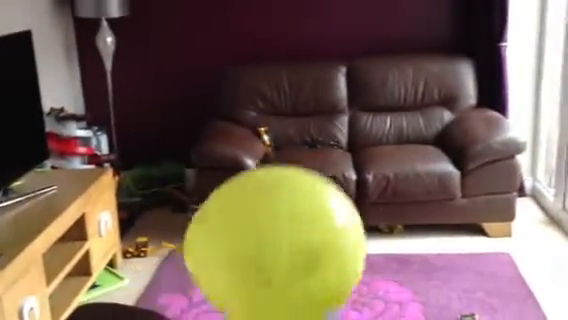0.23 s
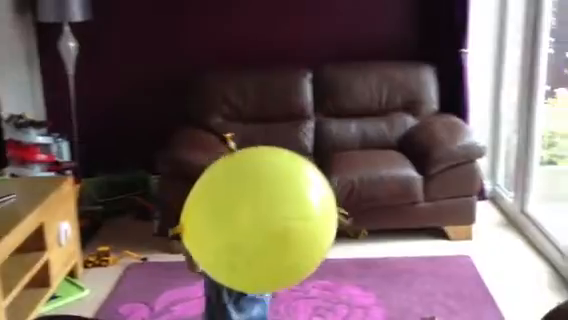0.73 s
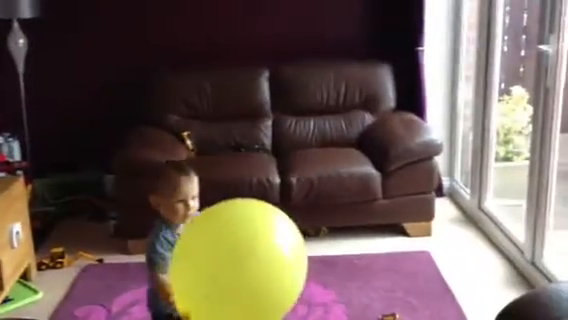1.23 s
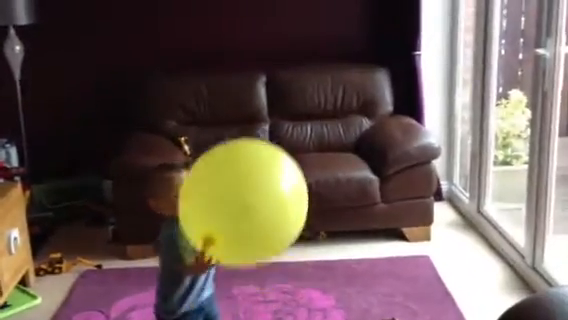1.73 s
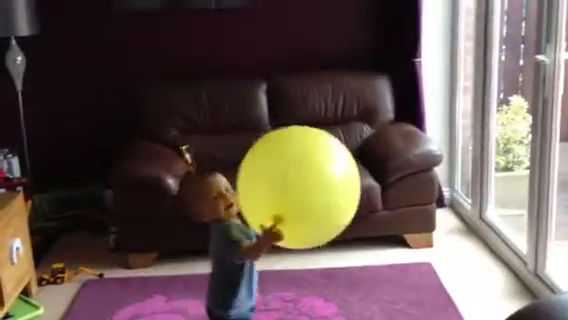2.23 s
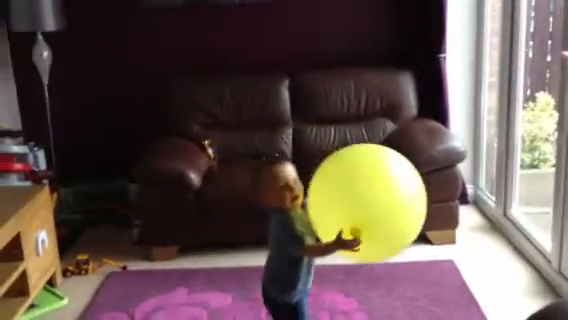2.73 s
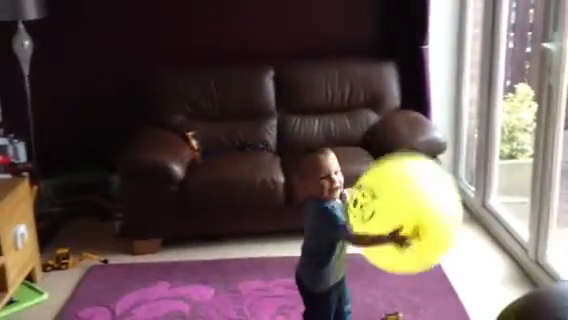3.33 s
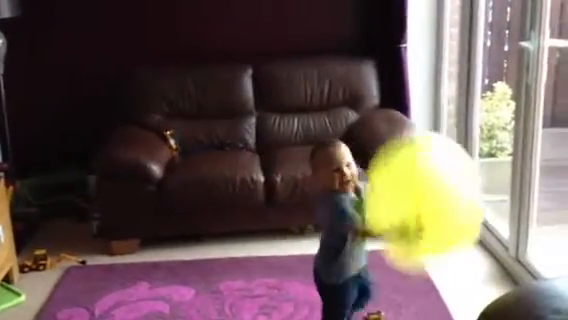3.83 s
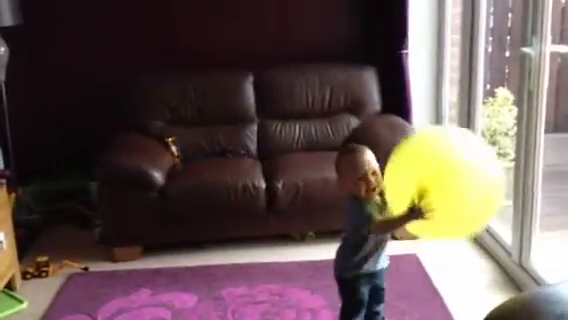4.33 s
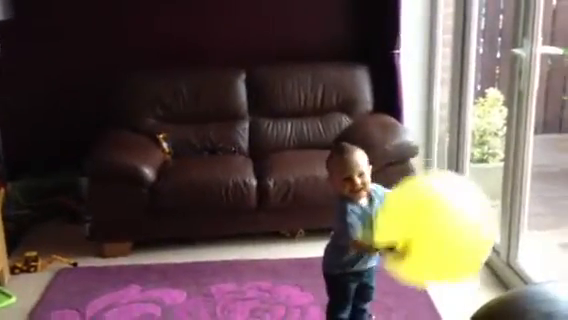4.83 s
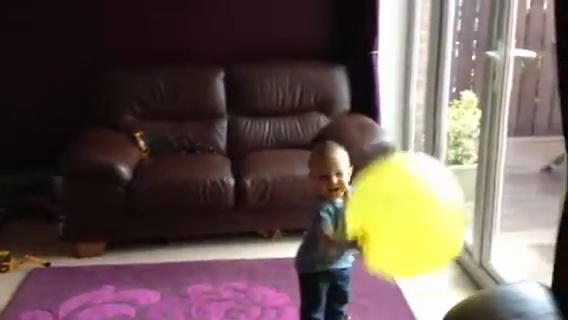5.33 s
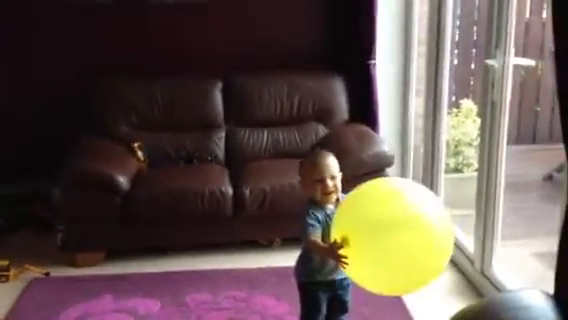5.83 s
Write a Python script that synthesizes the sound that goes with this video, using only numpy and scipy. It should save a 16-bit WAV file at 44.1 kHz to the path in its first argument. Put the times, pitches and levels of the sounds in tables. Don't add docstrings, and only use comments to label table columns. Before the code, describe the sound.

A large rubber balloon with grains inside is carried, patted and tipped over soft footsteps, then shaken into a dense, scratchy, drumming rattle.

```python
import sys
import numpy as np
from scipy import signal
from scipy.fft import rfft, irfft
from scipy.io import wavfile
from scipy.ndimage import uniform_filter1d

SR = 44100
rng = np.random.default_rng(int(sys.argv[2]) if len(sys.argv) > 2 else 0)


def ratio_of_db(decibels):
    return 10 ** (np.asarray(decibels, float) / 20)


def file_out(sig):
    cols = np.atleast_2d(sig).T
    lim = np.clip(cols, -1, 1)
    pcm = np.round(lim * 32767).astype(np.int16)
    wavfile.write(sys.argv[1], SR, pcm)


N = 267731


def evened(x):
    return x / np.sqrt(np.mean(x ** 2) + 1e-20)


def read(points, hz):
    f, value = np.transpose(points)
    return np.interp(np.log(hz + 1), np.log(f + 1), value)


def add(mix, s, sound):
    part = mix[round(s * SR):][:len(sound)]
    part += sound[:len(part)]


def coloured(x, spectrum):
    hz = abs(np.fft.fftfreq(8192, 1 / SR))
    log_gain = np.log(ratio_of_db(np.maximum(read(spectrum, hz), -100)))
    taps = np.fft.ifft(np.exp(np.conj(signal.hilbert(log_gain)))).real[:4096]
    return evened(signal.oaconvolve(x, taps)[:N])


def resonate(x, hz, width):
    return signal.lfilter(*signal.iirpeak(hz, hz / width, SR), x)


def house():
    # frequency in Hz, level in dB per Hz.
    hum_colour = [(40, -38), (100, -28), (160, -23), (300, -25), (450, -15), (680, -13), (880, -21),
                  (1500, -4), (2800, -10.5), (4700, -4.5), (5400, -7.5), (8000, -12.5), (10000, -23),
                  (15300, -31)]
    # pitch in Hz, level in dB rms.
    appliances = [(101, -82), (157, -83)]
    hum = coloured(rng.standard_normal(N), hum_colour)
    tones = sum(ratio_of_db(db) * evened(resonate(rng.standard_normal(N), hz, 14.0)) for hz, db in appliances)
    below_60_hz = signal.butter(2, 60, fs=SR, output="sos")
    rumble = evened(signal.sosfilt(below_60_hz, rng.standard_normal(N)))
    return ratio_of_db(-54) * hum + tones + ratio_of_db(-86) * rumble


def feet():
    # start in seconds, peak in dB, pitch in Hz.
    small_steps = [(0.632, -61, 132), (1.048, -45, 159), (1.05, -55, 85), (4.17, -63, 65), (5.08, -68, 65),
                   (1.129, -60, 143), (1.354, -52, 173), (1.539, -60, 163), (1.77, -51, 148),
                   (2.144, -52.5, 146), (3.16, -46, 149), (3.294, -62, 128), (3.561, -55, 153),
                   (3.732, -52, 140), (3.859, -65, 143), (4.082, -46, 160), (4.327, -47, 162),
                   (4.594, -50, 138), (4.909, -62, 148)]
    # start in seconds, peak in dB, pitch in Hz.
    heel_falls = [(0.626, -69, 102), (0.906, -67, 105), (1.353, -66, 124), (1.409, -72, 94.2),
                  (1.758, -71, 88.8), (1.893, -63, 110), (2.095, -73, 105), (2.458, -60, 124),
                  (2.504, -68, 91.5), (2.66, -62, 88.8), (2.972, -77, 72.7), (3.134, -61, 99.6),
                  (3.359, -68, 116), (3.429, -68, 124), (3.574, -63, 107), (3.753, -72, 124),
                  (4.067, -57, 124), (4.228, -72, 124), (4.357, -50, 115), (4.469, -67, 118),
                  (4.639, -67, 78.1), (4.78, -65, 105), (5.188, -61, 96.9), (5.553, -62, 116)]
    out, t = np.zeros(N), np.arange(SR // 3) / SR
    attack = 1 - np.exp(-t / 0.0061)
    for s, db, hz in small_steps + heel_falls:
        decay = ratio_of_db(db + 6.0 - 60 * t / 0.16)
        add(out, s, decay * np.sin(2 * np.pi * hz * t) * attack)
    return out


def pats():
    # start in seconds, peak in dB, skin pitch in Hz, t60 in seconds, slap level in dB.
    pat_rows = [(0.228, -49, 343, 0.17, -45), (0.519, -45, 373, 0.16, -48), (0.597, -62, 289, 0.15, -40),
                (0.808, -49, 211, 0.12, -40), (1.042, -39, 230, 0.15, -37), (1.274, -41, 250, 0.13, -52),
                (1.346, -40, 208, 0.1, -60), (1.752, -40, 227, 0.17, -39), (1.888, -46, 198, 0.25, -40),
                (2.133, -36, 302, 0.12, -39), (2.409, -49, 240, 0.091, -49), (2.528, -48, 284, 0.073, -52),
                (2.713, -49, 252, 0.14, -32), (2.896, -57, 363, 0.095, -32), (3.133, -44, 289, 0.43, -48),
                (3.299, -38, 260, 0.14, -47), (3.579, -35, 285, 0.16, -30), (3.713, -48, 341, 0.11, -19.5),
                (3.983, -36, 366, 0.37, -33), (4.357, -29.5, 240, 0.2, -35), (4.766, -48, 330, 0.15, -21),
                (4.886, -34, 333, 0.12, -38), (5.019, -42, 253, 0.15, -24), (5.337, -38, 250, 0.18, -28)]
    partials = [(.65, -3.5), (1., 2), (1.45, -6), (2.3, -3)]  # (times the pitch, dB)
    out, t = np.zeros(N), np.arange(SR // 3) / SR
    slap_band = signal.butter(2, [350, 1600], "band", fs=SR, output="sos")
    for s, db, hz, t60, slap_db in pat_rows:
        ring = sum(ratio_of_db(d) * np.sin(2 * np.pi * hz * k * t + rng.uniform(0, 4.8)) for k, d in partials)
        add(out, s, ratio_of_db(db - 6.0 - 60 * t / t60) * ring * (1 - np.exp(-t / 0.011)))
        slap = evened(signal.sosfilt(slap_band, rng.standard_normal(len(t))))
        add(out, s, ratio_of_db(slap_db - 8.5 - 60 * t / 0.16) * slap * (1 - np.exp(-t / 0.0048)))
    return out


def squeaks():
    # start in seconds, length in seconds, pitch in Hz, level in dB, roughness from 0 to 1.
    slips = [(1.76, .14, 685, -50, .4), (1.97, .04, 1120, -44, .3), (.915, .04, 1280, -47, .5),
             (2.67, .065, 715, -46, .15), (2.455, .035, 195, -54, .3), (2.53, .05, 290, -59, .8),
             (3.3, .1, 250, -54, .7), (2.92, .06, 720, -49, .8), (3.16, .045, 750, -39, .4),
             (3.22, .04, 750, -45, .3), (3.29, .045, 700, -49, .9), (3.575, .04, 700, -36, .8),
             (3.875, .05, 590, -39, .2), (5.022, .022, 1300, -30, .3), (5.092, .036, 497, -31, .05),
             (5.122, .026, 495, -31.5, .05), (5.217, .05, 893, -25.5, .02), (5.262, .04, 855, -32, .05)]
    out = np.zeros(N)
    for s, length, hz, db, rough in slips:
        t = np.arange(0, length, 1 / SR)
        wander = rough * np.cumsum(rng.standard_normal(len(t))) * .08
        add(out, s, ratio_of_db(db) * np.sin(2 * np.pi * hz * t + wander) * np.hanning(len(t)) ** .4)
    return out


def snaps():
    # start in seconds, peak in dB.
    releases = [
        (2.5284, -31),
        (2.5337, -38),
        (2.5405, -39),
    ]
    out, t = np.zeros(N), np.arange(800) / SR
    for s, db in releases:
        ping = np.cos(2 * np.pi * 6500 * t) * np.exp(-t / .0004)
        crack = ping + .35 * rng.standard_normal(800)
        add(out, s, ratio_of_db(db - 60 * t / .02) * crack)
    return out


def ticks():
    # start in seconds, peak in dB.
    strikes = [
        (1.0467, -28),
        (1.7501, -39),
        (1.863, -38),
        (2.1338, -28),
        (2.158, -31),
        (2.743, -34),
        (3.4846, -9),
    ]
    out, t = np.zeros(N), np.arange(60) / SR
    for s, db in strikes:
        add(out, s, -ratio_of_db(db) * np.cos(2 * np.pi * 3000 * t) * np.exp(-t / .0002))
    return out


def hits(per_s, spread_db):
    size = ratio_of_db(spread_db * np.minimum(rng.exponential(1, N), 5)) * rng.choice([-1., 1.], N)
    return evened(size * (rng.random(N) < per_s / SR))


def patchy(x, depth_db):
    hz, t, z = signal.stft(x, SR, nperseg=1024, noverlap=768)
    patches = uniform_filter1d(rng.standard_normal(z.T.shape), size=8, axis=0)
    patches = evened(uniform_filter1d(patches, size=3, axis=1)).T
    return evened(signal.istft(z * ratio_of_db(depth_db * patches), SR, nperseg=1024, noverlap=768)[1][:N])


def humps(rows):
    roundness = 1.85
    t = np.arange(0, N / SR, .001)
    power = np.zeros(len(t))
    for s, db, rise, fall in rows:
        distance = abs((t - s) / np.where(t < s, rise, fall))
        power += ratio_of_db(2 * db - 12 * distance ** roundness)
    return np.interp(np.arange(N) / SR, t, power)


def motion():
    # time in seconds, patter in dB.
    rolling = [(0.0, -42.5), (0.3, -46), (0.89, -47), (1.1, -43.5), (1.38, -48.5), (1.43, -53.5),
               (1.6, -54), (1.68, -61), (1.93, -60), (2.06, -47.5), (2.47, -47.5), (2.515, -56), (2.8, -56),
               (3.34, -52.5), (3.5, -35), (5.3, -33), (5.62, -32.5), (5.85, -43), (6.07, -39.5)]
    # crest in seconds, patter in dB, fizz in dB, rise in seconds, fall in seconds.
    tips = [(0.0, -46, -53, .02, .03), (.146, -48, -62, .05, .05), (.344, -51, -57, .03, 0.018),
            (.53, -49, -59, 0.098, 0.027), (.66, -52, -58, .04, .06), (.768, -55, -60, 0.043, .02),
            (.936, -42.5, -45, .025, 0.02), (1.054, -39.5, -46, 0.015, 0.029), (1.3, -49.5, -55, .04, .07),
            (1.505, -56, -59, .012, 0.023), (1.554, -54.5, -65, 0.034, 0.055),
            (1.81, -48, -55, 0.055, 0.016), (1.897, -50, -53, .005, 0.021),
            (1.985, -38.5, -46.5, 0.033, 0.048), (2.144, -46, -51, .05, 0.06),
            (2.25, -46.5, -54, 0.014, 0.12), (2.532, -51, -51, .003, .04), (2.59, -45.5, -53, 0.029, 0.057),
            (2.678, -42.5, -58, 0.06, 0.072), (2.85, -47, -58, 0.021, 0.056),
            (2.93, -43.5, -71, 0.073, 0.032), (3.02, -45.5, -60, 0.018, 0.2), (3.1, -49, -54, 0.055, .1),
            (3.172, -37.5, -58, 0.017, 0.054)]
    throws = [(3.376, -30.5, -39.5, 0.019, 0.045), (3.486, -21.5, -34.5, 0.026, 0.064),
              (3.617, -22.5, -32.5, 0.042, 0.039), (3.724, -23, -31.5, 0.038, 0.078),
              (3.885, -23, -35.5, 0.062, 0.056), (4.014, -22.5, -31, 0.043, 0.092),
              (4.172, -23, -34, 0.045, 0.053), (4.318, -23.5, -32, 0.058, 0.07),
              (4.5, -25.5, -37, 0.1, 0.046), (4.63, -23, -31.5, 0.053, 0.077),
              (4.765, -24.5, -41, 0.052, 0.063), (4.925, -22, -31.5, 0.055, 0.065),
              (5.046, -24, -33, 0.038, 0.068), (5.2, -22.5, -33.5, 0.048, 0.093),
              (5.384, -27, -38, 0.073, 0.05), (5.54, -28, -43, 0.065, 0.13), (6.05, -36, -58, 0.12, 0.037)]
    # crest in seconds, wobble in dB, drumming in dB, fall in seconds.
    grip_jolts = [(0.0, -59, -45, 0.04), (.136, -57, -48, 0.041), (.3, -70, -54, 0.15),
                  (.604, -62, -49, 0.046), (.94, -45, -49, 0.023), (.936, -70, -49, .02),
                  (1.048, -50.5, -49, 0.19), (1.354, -51.5, -60, 0.055), (.7, -63, -49, 0.064),
                  (1.834, -56, -48, 0.028), (1.99, -59, -60, 0.026), (2.27, -63, -65, 0.066),
                  (2.424, -57, -56, 0.033), (2.542, -55, -50, 0.051), (2.62, -57, -65, 0.044),
                  (2.97, -61, -53, 0.12), (.87, -53, -54, 0.045), (3.172, -51, -35, 0.029),
                  (3.312, -46, -61, 0.021), (3.365, -48, -34.5, 0.24), (3.497, -59, -26.5, 0.012),
                  (3.598, -54, -23.5, 0.0087), (3.729, -53, -32.5, 0.33), (3.999, -46, -37, 0.27),
                  (4.37, -36, -37, 0.022), (4.464, -55, -29, 0.025), (4.628, -43, -47, 0.022),
                  (4.898, -42, -47, 0.039), (5.1, -56, -31, 0.052), (5.216, -58, -50, 0.043),
                  (5.566, -38.5, -35, 0.01), (6.064, -55, -38, .03)]
    palm_knocks = [
        (0.812, -55, -56, .03),
        (1.754, -52, -52, 0.16),
        (2.136, -46.5, -41.5, 0.032),
        (2.716, -46, -54, 0.056),
        (2.9, -47, -39.5, .05),
    ]
    jolt_rise_s, knock_rise_s = 0.022, 0.004
    skin_lag_s = 0.17

    roll = ratio_of_db(2 * np.interp(np.arange(N) / SR, *np.transpose(rolling)))
    moves = np.array(tips + throws)
    jolts = np.array([row + (jolt_rise_s,) for row in grip_jolts]
                     + [row + (knock_rise_s,) for row in palm_knocks])
    patter = roll + humps(moves[:, [0, 1, 3, 4]])
    fizz = roll * ratio_of_db(2 * -13) + humps(moves[:, [0, 2, 3, 4]])
    stir_db = uniform_filter1d(10 * np.log10(patter), round(skin_lag_s * SR)) + 45
    wobble = ratio_of_db(2 * (-65 + 0.74 * stir_db)) + humps(jolts[:, [0, 1, 4, 3]])
    drum = ratio_of_db(2 * (-51 + 0.82 * stir_db)) + humps(jolts[:, [0, 2, 4, 3]])
    return np.sqrt([patter, fizz, wobble, drum])


def grains():
    # frequency in Hz, level in dB per Hz.
    patter_colour = [(60, -63), (400, -18), (800, -7.5), (1300, -2), (2600, 0), (4700, -2), (5400, -6.5),
                     (6200, -6.5), (7200, -8.5), (8500, -12.5), (9900, -18), (12500, -23.5), (14000, -30),
                     (15300, -31)]
    fizz_colour = [(300, -80), (3000, -47), (6000, 0.5), (7200, 0.5), (8500, 0), (9900, -9), (12500, -10.5),
                   (14000, -15), (15300, -23)]
    wobble_colour = [(40, -50), (100, -21), (130, -14), (170, -6), (250, 1.5), (400, -3.5), (600, -14),
                     (1000, -30)]
    drum_colour = [(60, -62), (200, -26), (400, -4.5), (460, -12.5), (600, -0.5), (750, 2), (865, -6.5),
                   (1000, -0.5), (1400, -2), (2200, -26)]
    # pitch in Hz, width in Hz, level in dB.
    body = [(490, 28, -17), (575, 54, -5.5), (673, 9.4, 1), (807, 39, -0.5), (932, 32, 0.5),
            (1118, 62, -11), (1235, 18, -28), (1963, 173, 19)]
    patter_gain, fizz_gain, wobble_gain, drum_gain = motion()
    patter = patchy(coloured(hits(per_s=12000, spread_db=1.0), patter_colour), depth_db=1.48)
    fizz = patchy(coloured(hits(per_s=16000, spread_db=0.8), fizz_colour), depth_db=2.5)
    wobble = coloured(hits(per_s=2500, spread_db=0.3), wobble_colour)
    drum = coloured(hits(per_s=4000, spread_db=1.6), drum_colour)
    drum = evened(drum + sum(ratio_of_db(db) * resonate(drum, hz, width) for hz, width, db in body))
    out = ratio_of_db(0.93) * patter_gain * patter
    out += ratio_of_db(-1.0) * fizz_gain * fizz
    out += ratio_of_db(-2.0) * wobble_gain * wobble
    out += ratio_of_db(-3.5) * drum_gain * drum
    return out


def tail():
    # frequency in Hz, t60 in seconds.
    decay = [(150, 1), (700, 0.76), (2500, 0.89), (8000, 0.071), (15000, 0.55)]
    taps = np.zeros(SR // 2)
    at = np.arange(200, len(taps) - 20, 20)
    taps[at + rng.integers(0, 20, len(at))] = rng.choice([-1., 1.], len(at))
    hz, t, z = signal.stft(taps, SR, nperseg=256)
    fade = ratio_of_db(-60 * t / read(decay, hz)[:, None])
    echo = signal.istft(z * fade, SR, nperseg=256)[1]
    return echo / np.linalg.norm(echo)


def room(x, count=8):
    place = np.arange(N) / N * (count - 1)
    out = np.zeros(N)
    for k in range(count):
        nearness = np.cos(np.pi / 2 * np.clip(place - k, -1, 1))
        out += signal.oaconvolve(x * nearness, tail())[:N]
    return out


def scene():
    hands = pats() + squeaks() + snaps() + ticks()
    play = feet() + hands + grains()
    mono = house() + play + ratio_of_db(-12.0) * room(play)
    return np.array([mono, mono])


def widened(x):
    # centre in seconds, low edge in Hz, high edge in Hz.
    wide_moments = [(.124, 5060, 6930), (.612, 11690, 13180), (1.192, 6200, 7640), (1.192, 8180, 9710),
                    (1.471, 6200, 8310), (1.54, 5100, 6980), (1.54, 9560, 11740), (1.703, 4130, 5250),
                    (2.446, 5120, 6310), (2.446, 7470, 9040), (2.957, 5080, 6350), (3.746, 6240, 7640),
                    (3.746, 11650, 13820), (3.909, 4160, 6400), (3.909, 10940, 13110), (4.025, 4160, 5230),
                    (5.372, 5600, 6960), (5.372, 10250, 12490), (5.79, 4220, 5230), (5.79, 10290, 11800)]
    out, hz = x.copy(), np.fft.rfftfreq(2048, 1 / SR)
    window = np.sin(np.pi * (np.arange(2048) + .5) / 2048)
    for s, low_hz, high_hz in wide_moments:
        start = round(s * SR) - 1024
        band = rfft(x[0, start:start + 2048] * window) * (hz > low_hz) * (hz < high_hz)
        other = abs(band) * np.exp(2j * np.pi * rng.random(len(hz))) * ratio_of_db(-1.0)
        sides = np.array([[1], [-1]]) * irfft(other)
        out[:, start:start + 2048] += window * (sides - .3 * irfft(band))
    return out


def band_limit(x):
    return signal.sosfilt(signal.butter(12, 15400, fs=SR, output="sos"), x)


def record(dry):
    thin = signal.sosfilt(signal.butter(2, 110, "high", fs=SR, output="sos"), dry)
    top_cut = signal.firwin(401, 15400, window=("kaiser", 9), fs=SR)
    thin = signal.oaconvolve(thin, top_cut[None], "same")
    return band_limit(widened(thin))


dry = scene()
out = record(dry)
file_out(out)
```